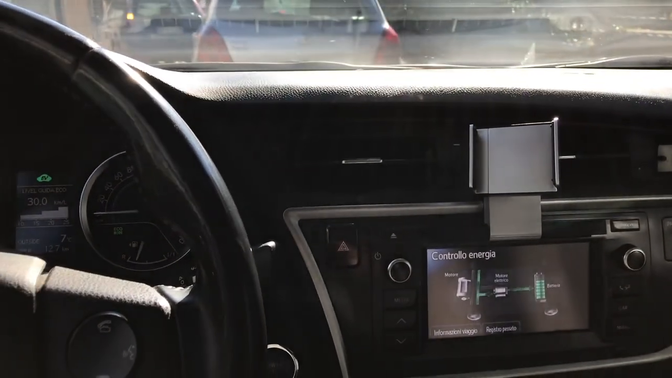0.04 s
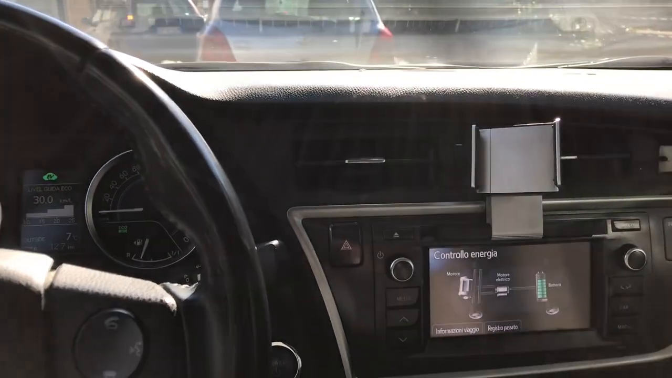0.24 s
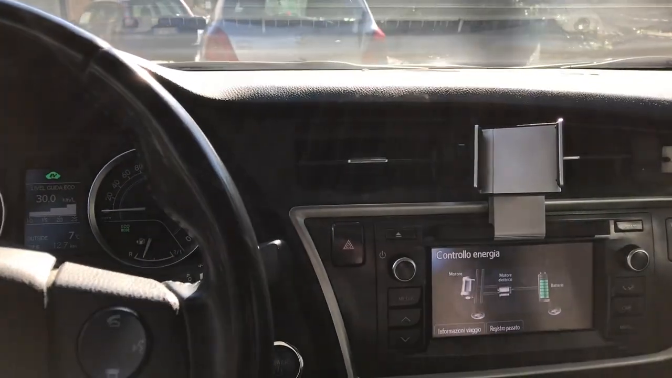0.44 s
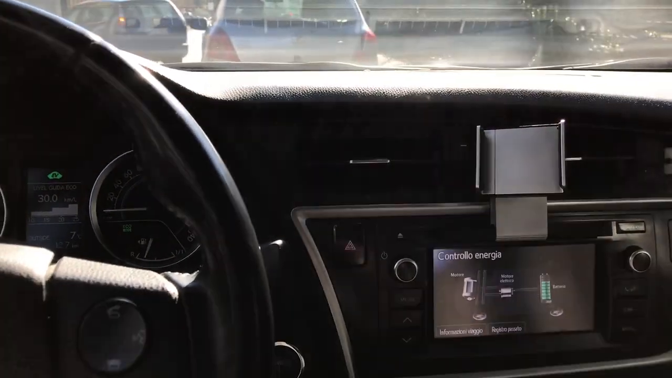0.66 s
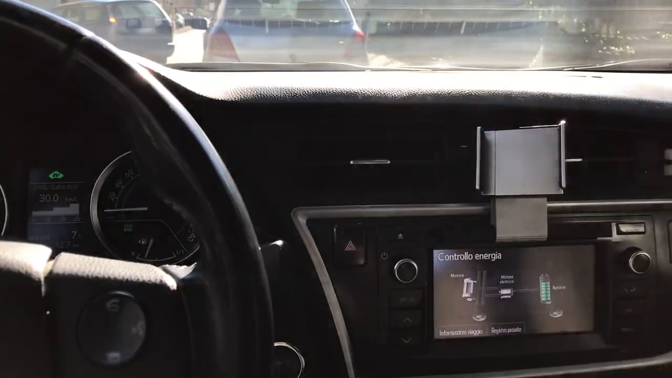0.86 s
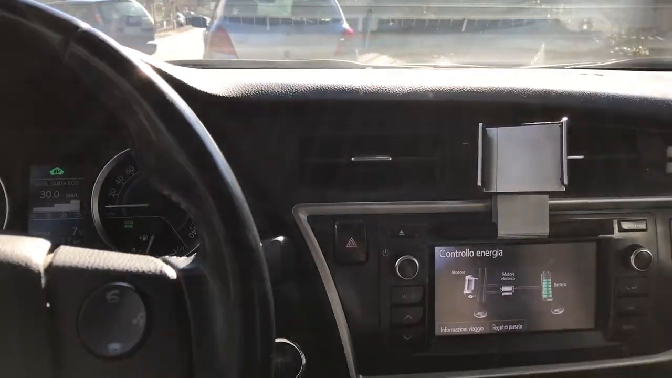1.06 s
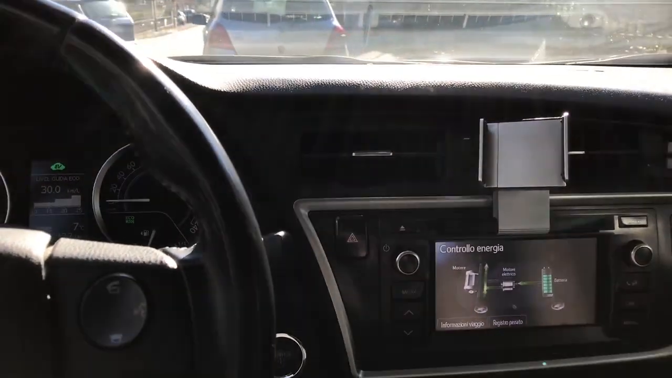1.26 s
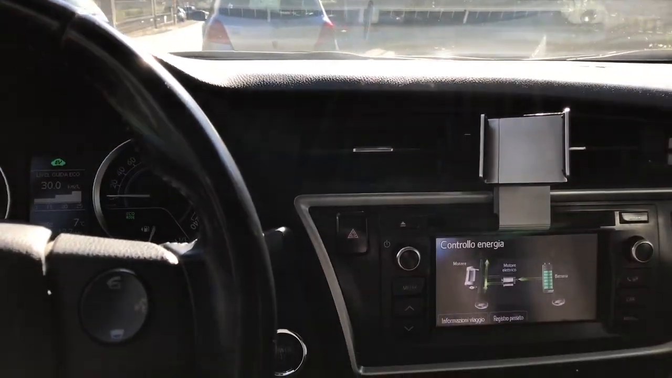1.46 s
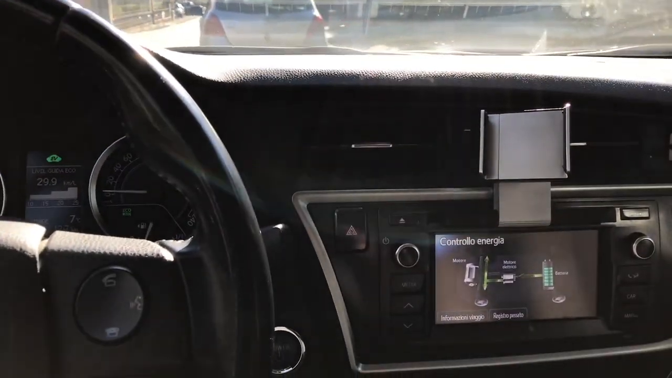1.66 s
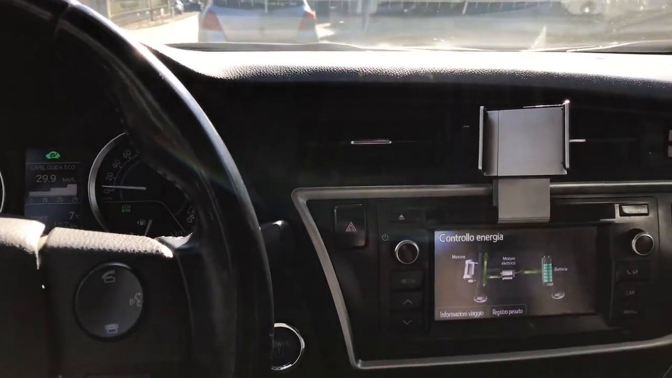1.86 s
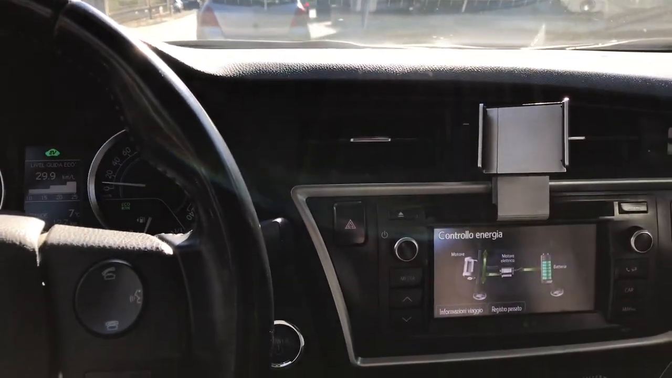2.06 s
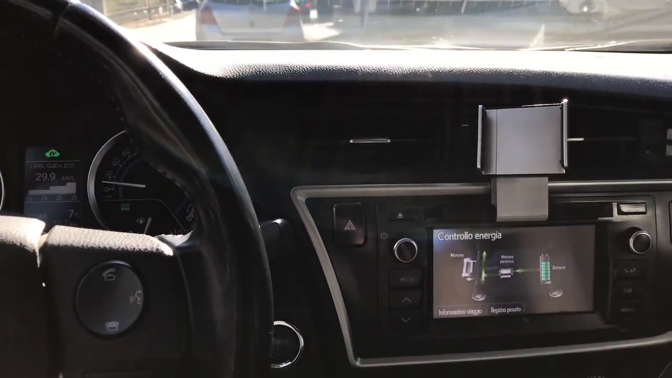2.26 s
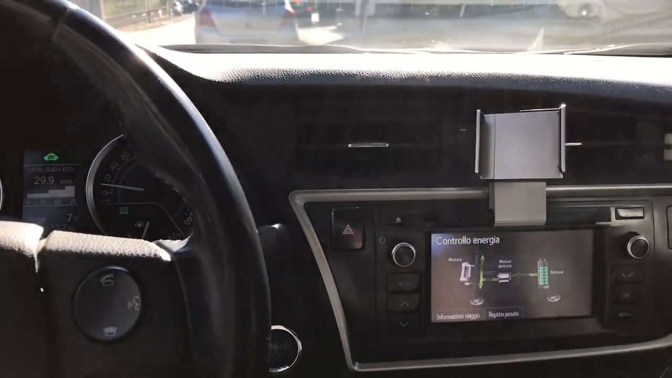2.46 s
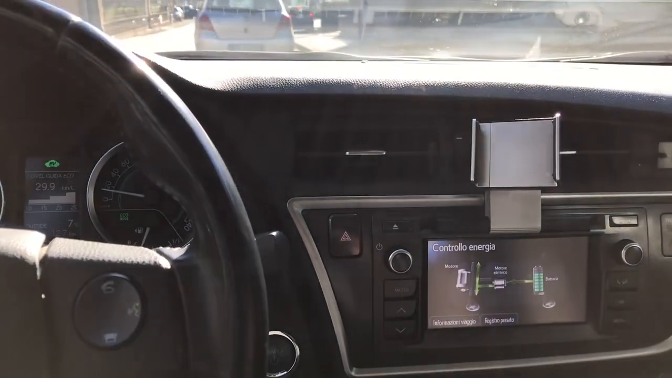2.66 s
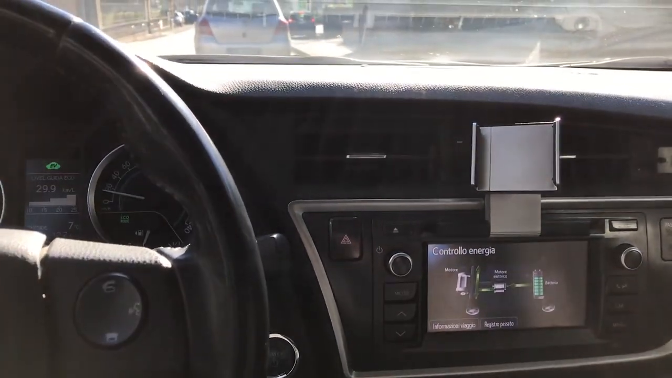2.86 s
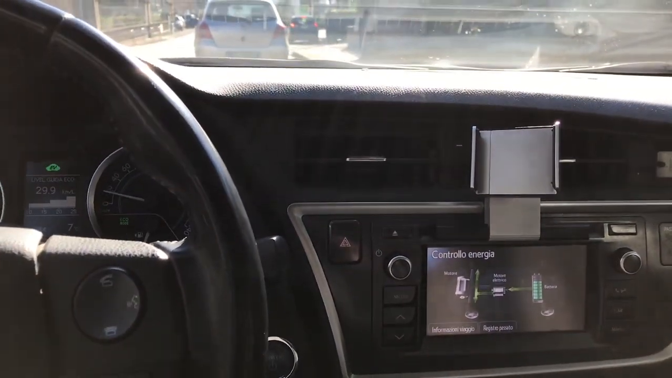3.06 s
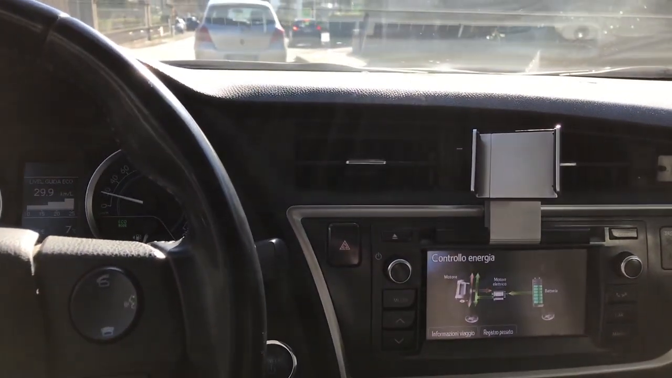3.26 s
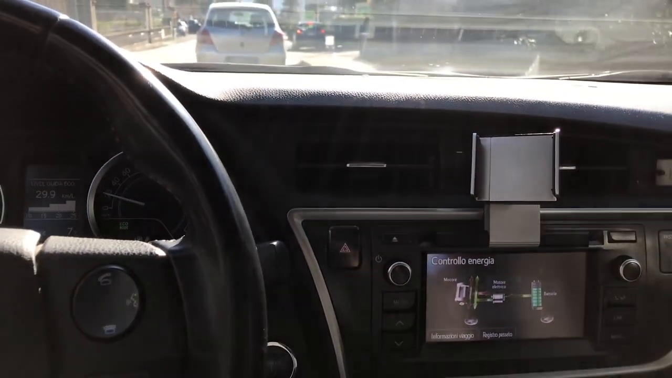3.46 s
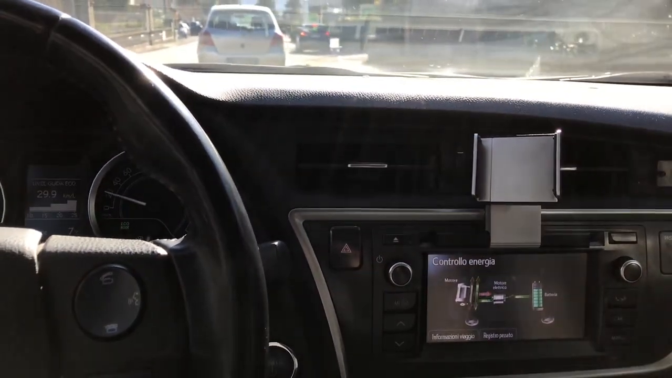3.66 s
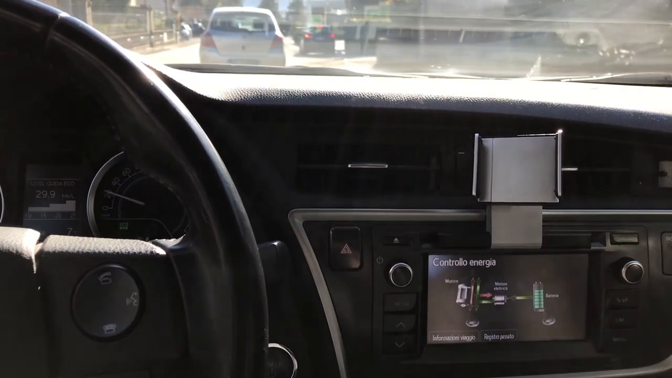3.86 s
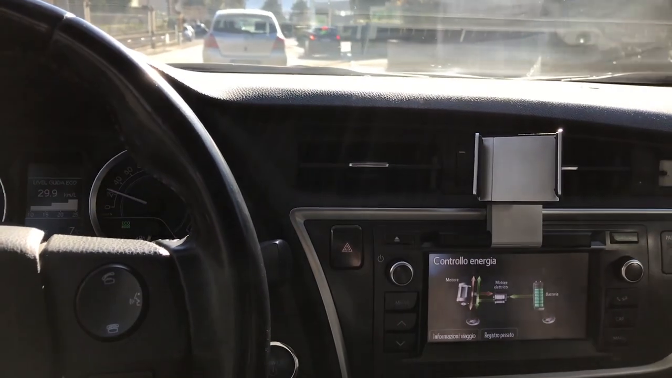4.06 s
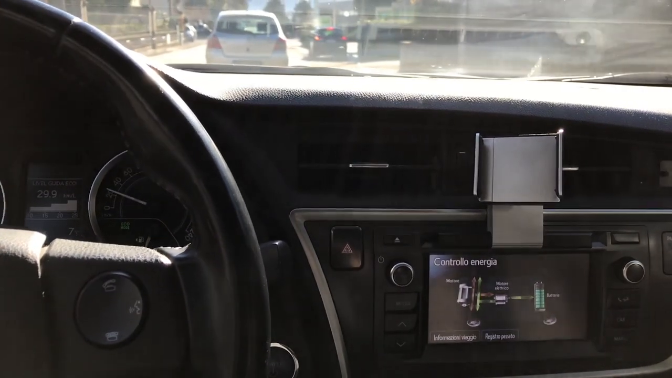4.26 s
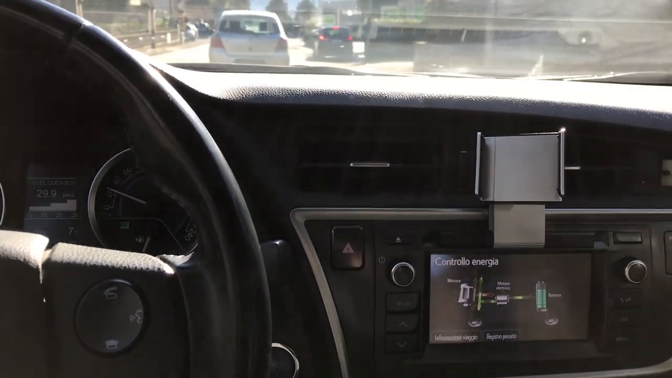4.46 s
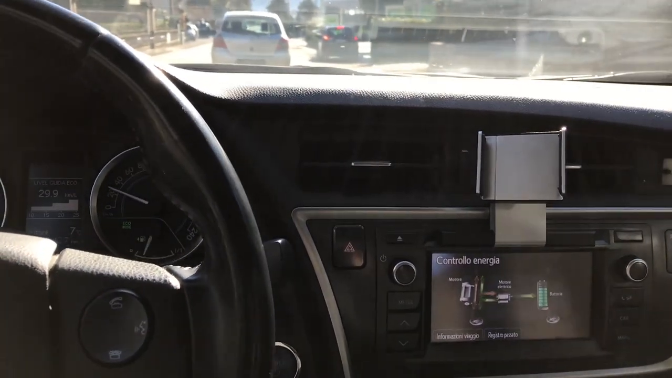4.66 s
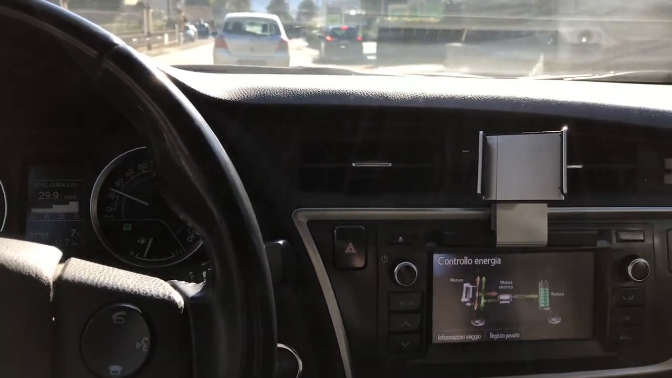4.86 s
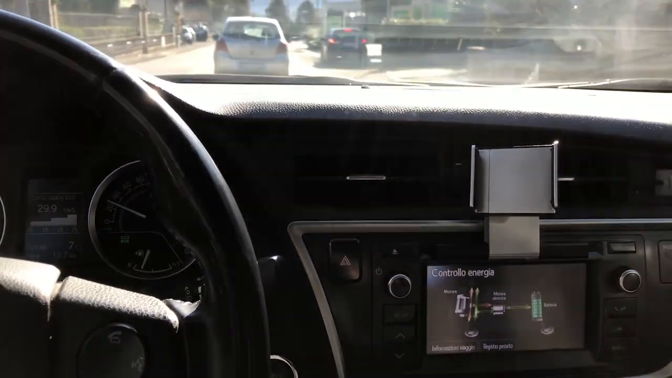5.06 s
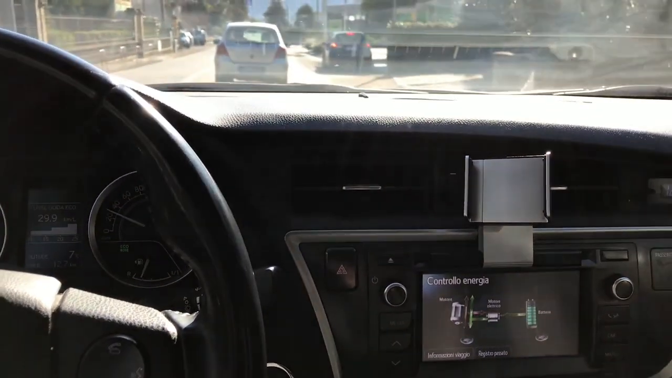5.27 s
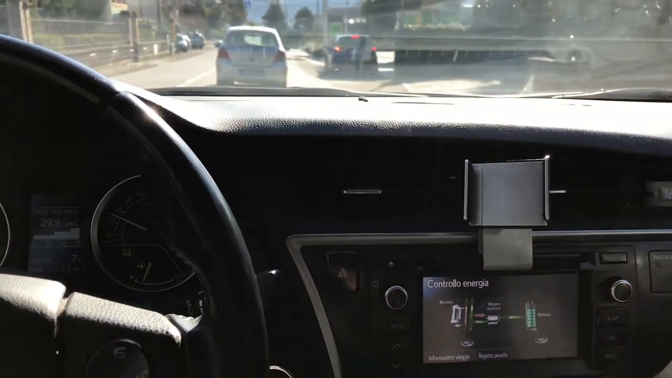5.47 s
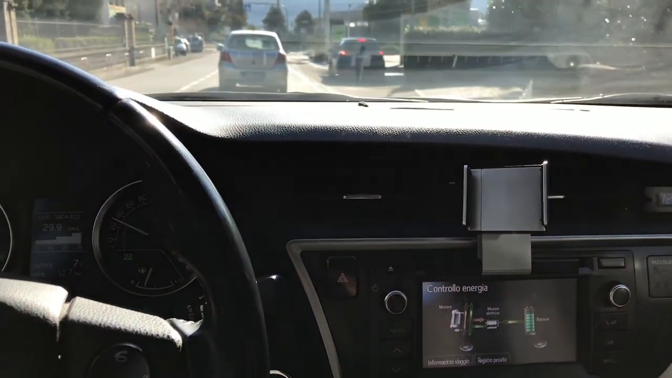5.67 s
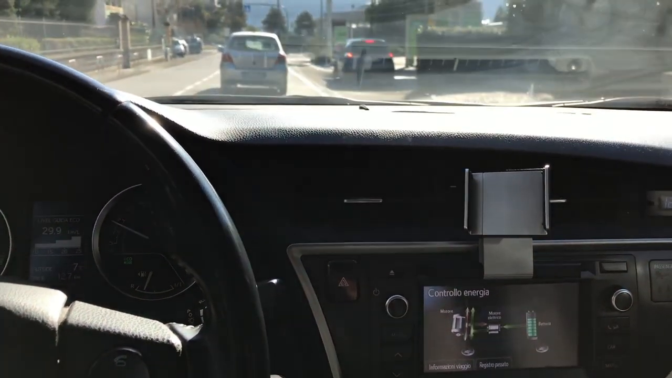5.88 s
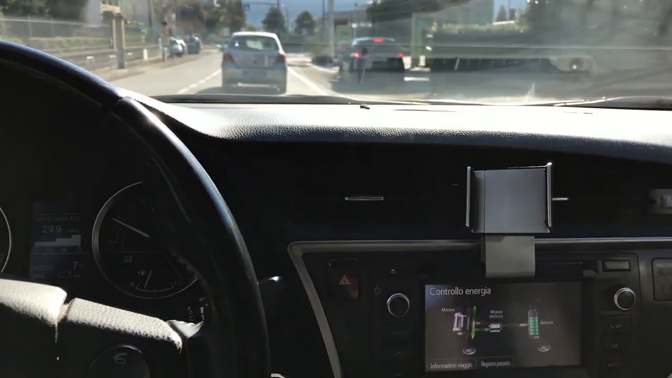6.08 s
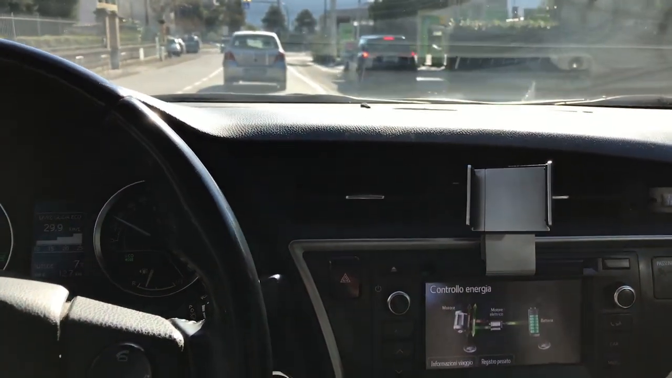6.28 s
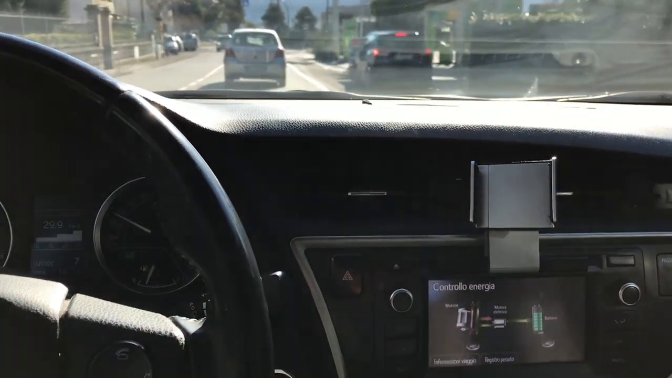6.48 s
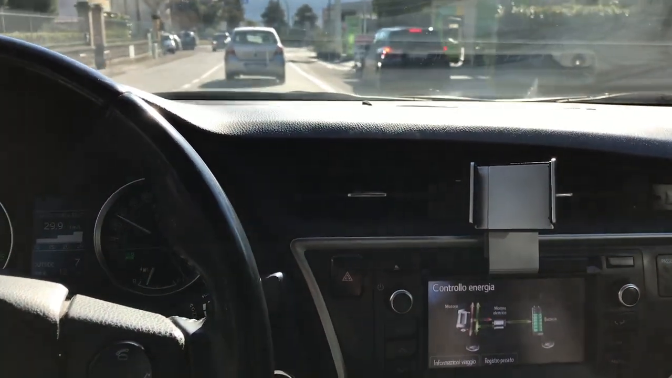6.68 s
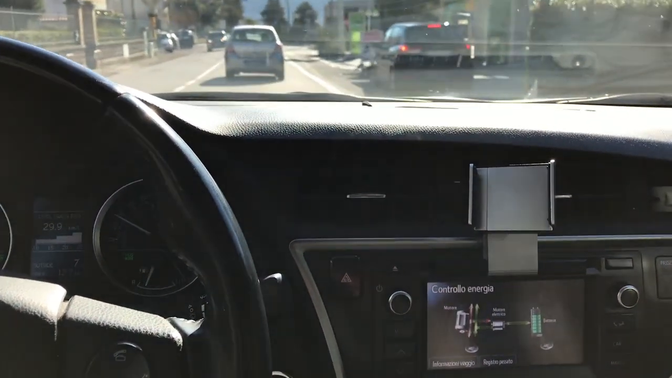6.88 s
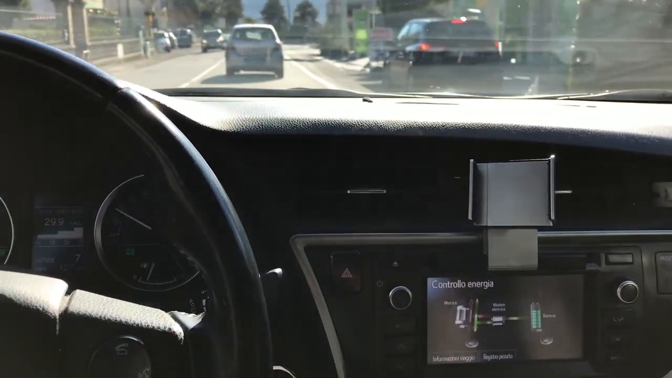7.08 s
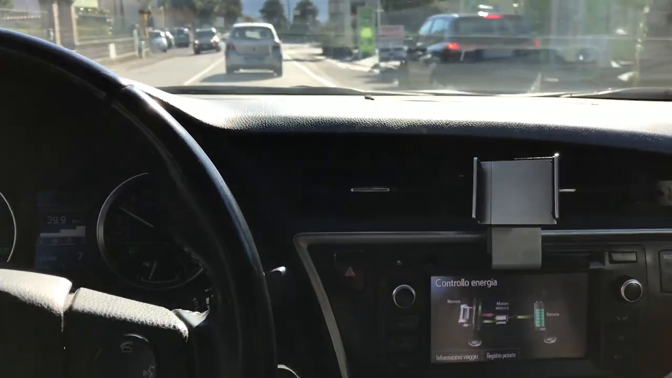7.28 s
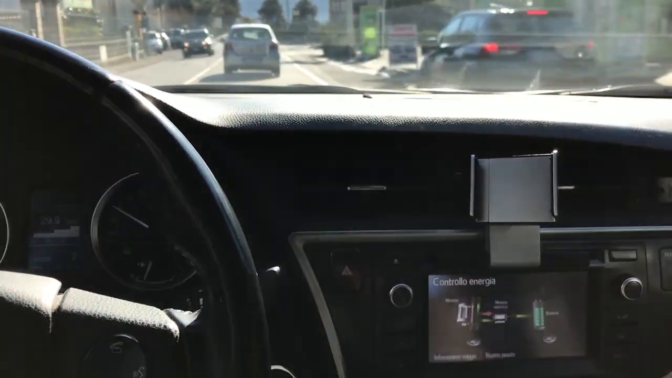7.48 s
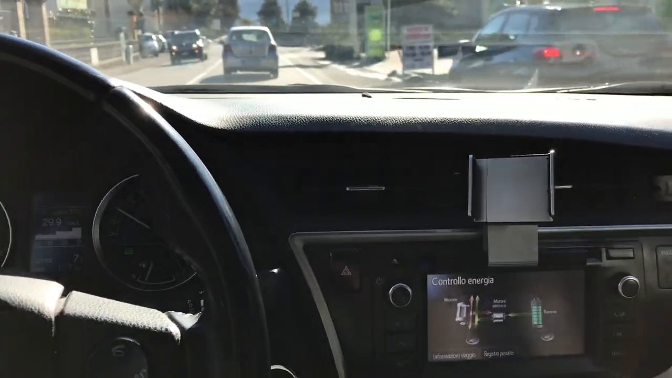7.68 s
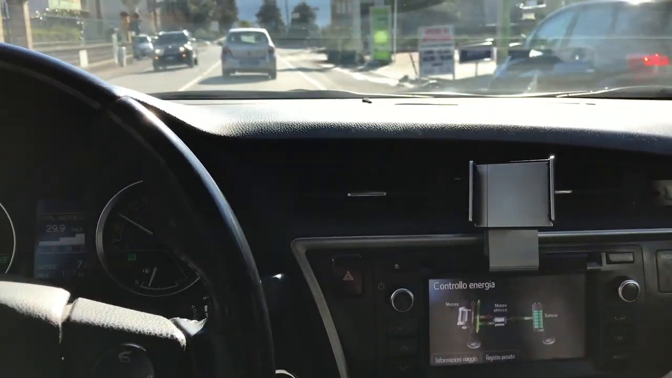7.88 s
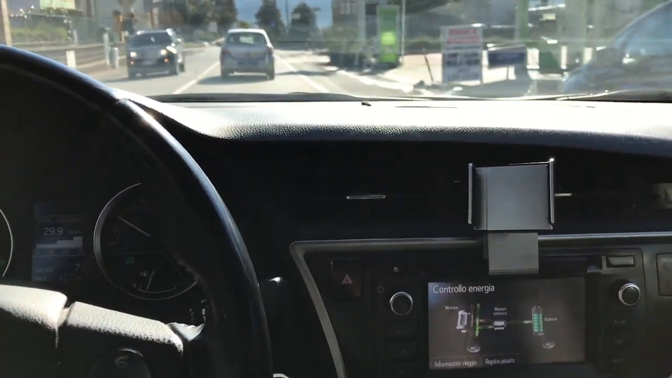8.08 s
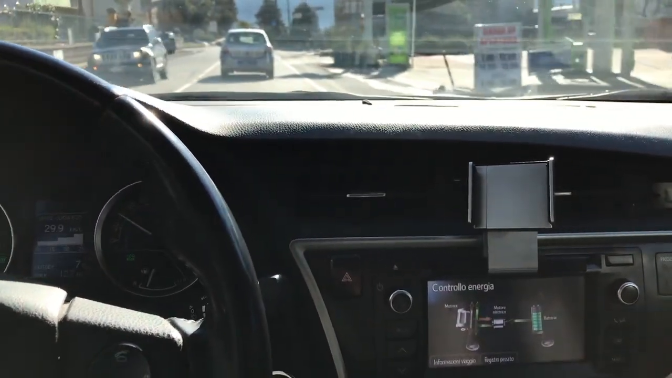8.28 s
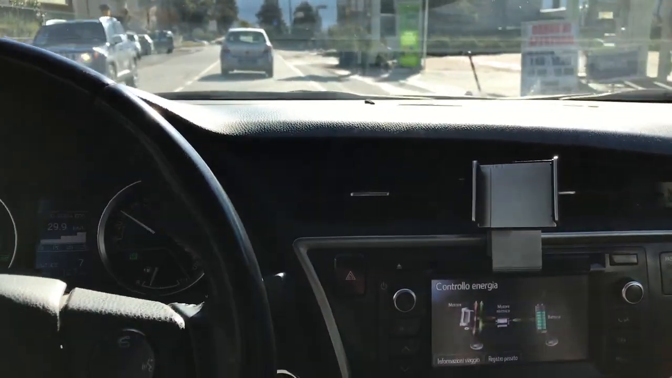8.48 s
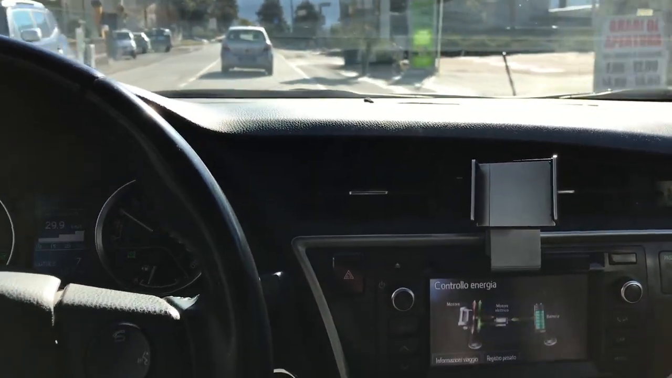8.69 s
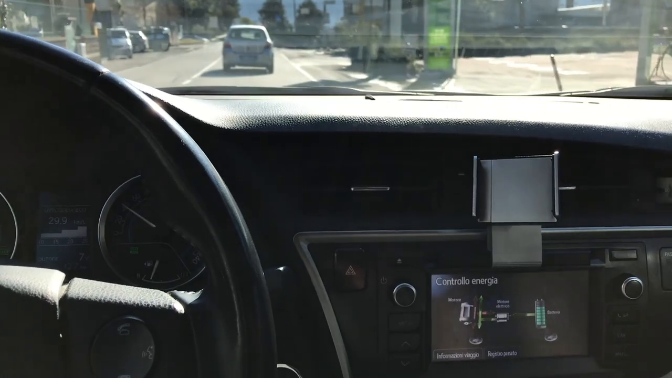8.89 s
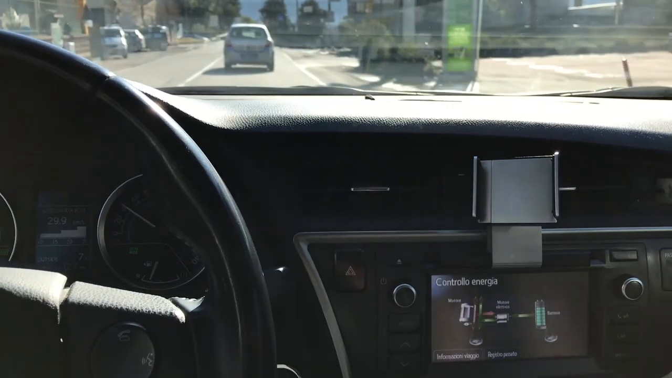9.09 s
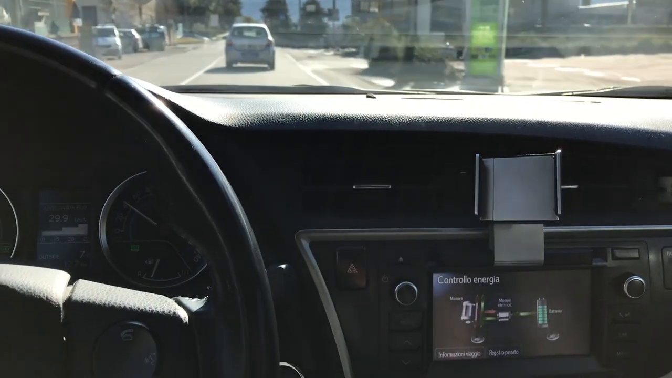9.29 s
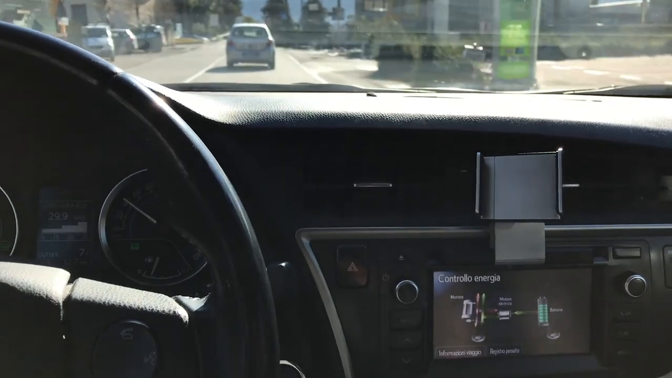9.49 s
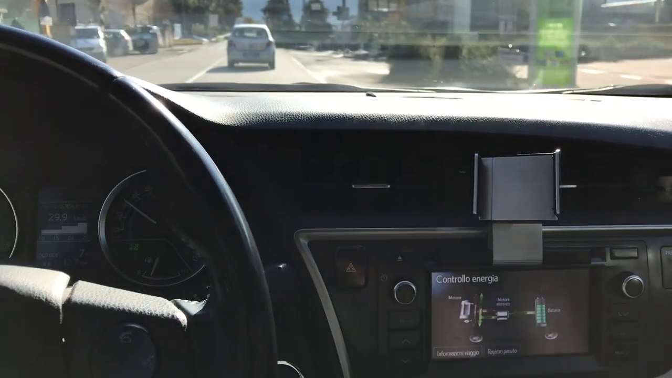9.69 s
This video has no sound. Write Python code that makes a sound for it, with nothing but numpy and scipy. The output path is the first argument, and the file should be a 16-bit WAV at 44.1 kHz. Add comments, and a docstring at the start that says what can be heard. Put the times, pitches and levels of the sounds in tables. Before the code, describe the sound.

Heard from the driver's seat, a hybrid car creeps along with a quiet low rumble. The steering wheel gives faint creaks and ticks, then a plastic catch snaps once, sharply. A soft electric whine climbs as the car pulls away, and the petrol engine starts with a light clatter and settles into a low drone. Tyre noise grows louder, and late on road bumps boom dully while another car passes faintly.

```python
"""Inside a hybrid car that creeps in traffic and then pulls away, over the rumble of the road.
The steering wheel creaks in the grip and a ratchet clicks as it turns back. The electric motor's whine
starts to climb, a plastic catch snaps once, and soft scuffs come and go, some of them a hand on the wheel.
The generator cranks the petrol engine, which clatters and booms in the cabin as the tyres grow louder.
Late on, road bumps boom, the trim ticks, the engine pulls again and another car goes by."""
import sys
import numpy as np
from scipy import signal
from scipy.fft import rfft, irfft, next_fast_len
from scipy.io import wavfile
from scipy.ndimage import uniform_filter1d

SR = 44100
rng = np.random.default_rng(int(sys.argv[2]) if len(sys.argv) > 2 else 0)


def inscribe(sig):
    """Save sig as 16-bit PCM at rate SR to the path in sys.argv[1].

    A 1-D sig is mono; a 2-D sig holds one channel per row.
    Samples are clipped to [-1, 1] before scaling.
    """
    pcm = np.round(np.clip(np.atleast_2d(sig).T, -1, 1) * 32767)
    wavfile.write(sys.argv[1], SR, pcm.astype(np.int16))


N = 429534
TIME = np.arange(N) / SR

# speed of the car, as the pitch of the motor's whine: (time [s], pitch [Hz])
MOTOR_PITCH = [(1.15, 124.9), (1.7, 209.9), (2.3, 338), (2.9, 444.7), (4.2, 581.5), (5.6, 735), (7.2, 835),
               (9.74, 890)]
CRUISE_HZ = 890   # that pitch at the highest speed
# speed of the four-cylinder engine: (time [s], firing rate [Hz])
FIRING_RATE = [(3.5, 37), (3.8, 49.5), (4.32, 48), (4.64, 42.3), (5.0, 44.8), (5.52, 46.2), (6.13, 46.5),
               (6.4, 40.5), (7.3, 40.2), (8.17, 41.9), (9.74, 44.5)]


def electric_drive(wobble=0.011, flutter_db=3, handover_s=2.886, shaft_db_per_doubling=14.5):
    """The motor whines six times a shaft cycle; its shaft hums while it pulls the car alone."""
    # the whine comes and goes as it sweeps the cabin's modes: (pitch [Hz], level [dB])
    cabin_response = [(240, -74), (295, -52.5), (335, -59), (365, -67), (395, -61), (430, -72), (595, -80),
                      (640, -70), (775, -72), (810, -86)]
    hz = in_time(MOTOR_PITCH)
    phase = turning(hz * (1 + wobble * drift(60)))
    shaft_db = -33 + shaft_db_per_doubling * np.log2(hz / np.interp(handover_s, TIME, hz))
    alone = 1 - fade_in(handover_s, 0.15)
    shaft = alone * from_db(shaft_db + drift(10)) * np.sin(phase / 6)
    whine = from_db(look_up(cabin_response, hz) + flutter_db * drift(16)) * np.sin(phase)
    overtone = from_db(-73) * swell_at(2.07, 0.19) * np.sin(2 * phase)   # only at low speed
    return np.sqrt(2) * fade_in(MOTOR_PITCH[0][0], 0.37) * (shaft + whine + overtone)


def engine(wobble=0.003, throb=0.25, cabin_hz=135, cabin_half_width_hz=12):
    """The firing booms in the cabin; orders three and five sing under load, order two when coasting."""
    # strength of the boom: (firing rate [Hz], level [dB])
    boom_levels = [(40, -37.5), (42.5, -35.5), (43.8, -30.5), (47, -30.5), (50, -33)]
    # spells under load: (start [s], attack [s], end [s])
    pulls = [(3.65, 0.33, 6.25), (8.1, 0.14, 9.8)]
    firing = in_time(FIRING_RATE)
    phase = turning(firing * (1 + wobble * drift(14)))
    running = fade_in(FIRING_RATE[0][0], 0.16)
    loaded = sum(held(start, attack, end, release_s=0.17) for start, attack, end in pulls)
    boom = from_db(look_up(boom_levels, firing) + 0.8 * drift(12)) * np.sin(phase)
    second = from_db(-44) * (1 - loaded) * np.sin(2 * phase)
    third = from_db(-37) * loaded * (1 + throb * np.sin(phase / 2)) * np.sin(3 * phase)
    third /= np.hypot(1, (3 * firing - cabin_hz) / cabin_half_width_hz)   # loudest on the cabin mode
    fifth = from_db(-56) * loaded * np.sin(5 * phase)
    return np.sqrt(2) * running * (boom + second + third + fifth)


def clatter(level_db=-60.5, beat_depth=0.34):
    """Valves and chain rasp in time with the firing as the engine takes up the load, then settle."""
    # colour of the rasp: (frequency [Hz], level [dB])
    rasp = [(270, 5), (335, 21), (420, 3.5), (510, 9), (800, -11.5), (1250, 3), (1700, -9), (2700, -14)]
    envelope = held(start_s=3.62, attack_s=0.055, end_s=4.33, release_s=1.0)
    beat = 1 + beat_depth * np.sin(turning(in_time(FIRING_RATE)))
    return from_db(level_db) * envelope * beat * noise(rasp)


def generator(top_s=3.92, top_hz=66.2, sweep_hz_per_s=27, body_hz=49.7, body_width_hz=1.7):
    """The generator cranks the engine, then slows; its hum swells each time it crosses the body mode."""
    hz = top_hz - sweep_hz_per_s * np.abs(TIME - top_s)
    resonance = from_db(-29.5) / np.hypot(1, 2 * (hz - body_hz) / body_width_hz)
    direct = from_db(-42) * hz / top_hz
    cranking = held(start_s=2.75, attack_s=0.026, end_s=4.57, release_s=0.026)
    return np.sqrt(2) * cranking * (resonance + direct) * from_db(drift(13)) * np.sin(turning(hz))


def road(rumble_knee_hz=305, drone_knee_hz=853, roar_db_per_doubling=14.5, flutter_db=1.02):
    """Asphalt shakes the suspension, drums in the tyres and roars under the tread, more so with speed."""
    # colours of the three bands, each: (frequency [Hz], level [dB])
    suspension_colour = [(18, -11), (42, -1.5), (54, 5), (70, -4), (95, -5), (125, -4), (160, -15),
                         (200, -38)]
    tyre_colour = [(110, -22.5), (165, 6.5), (195, -1.5), (215, 4), (245, -3), (290, -2.5), (325, -11),
                   (385, -10), (520, -20), (800, -26)]
    roar_colour = [(300, 5), (500, 3), (680, -4.5), (930, 1), (1400, -3.5), (3200, -21), (5000, -36.5),
                   (9000, -61)]
    # rough and smooth asphalt: (middle [s], half length [s], extra rumble [dB], extra drone [dB])
    patches = [(0.235, 0.12, 5, 8.5), (1.03, 0.086, 3, -3), (5.198, 0.85, -3, 0.5), (7.6, 0.53, 2.5, 1.5)]
    speed = in_time(MOTOR_PITCH)
    rumble_db = -35.5 + sum(db * swell_at(s, half) for s, half, db, _ in patches)
    drone_db = -42.5 + sum(db * swell_at(s, half) for s, half, _, db in patches)
    # rumble and drone level off once the motor's pitch passes their knees
    rumble_gain = from_db(rumble_db) / np.hypot(1, rumble_knee_hz / speed)
    drone_gain = from_db(drone_db) / np.hypot(1, drone_knee_hz / speed)
    coarse_db = 4 * fade_in(2.8, 0.089)   # the asphalt turns coarser
    roar_db = -63 + roar_db_per_doubling * np.log2(speed / CRUISE_HZ) + coarse_db
    roar_gain = np.sqrt(from_db(roar_db) ** 2 + traffic_power())   # other cars share this band
    rumble = rumble_gain * steadied(noise(suspension_colour), span_s=0.18, share=1)
    drone = drone_gain * steadied(noise(tyre_colour), span_s=0.088, share=0.31)
    roar = roar_gain * from_db(flutter_db * drift(25)) * noise(roar_colour)
    return rumble + drone + roar


def low_booms(ring_cycles=18.5, rise_cycles=4.6, low_cut_hz=30):
    """Low booms swell and die away: road bumps, plus a brief 95 Hz hum as the car gathers speed."""
    # low booms: (time [s], level [dB], pitch [Hz])
    booms = [(0.201, -36, 51.3), (1.519, -29.5, 53), (2.039, -33, 95), (2.261, -28, 46.2),
             (7.38, -18.5, 46.9), (7.68, -28.5, 72), (8.5, -22, 42.5), (9.219, -34, 81.4)]
    out = np.zeros(N)
    for s, db, hz in booms:
        swell = dying(s, ring_cycles / hz) - dying(s, rise_cycles / hz)
        out += 2 * from_db(db) * swell * np.sin(2 * np.pi * hz * (TIME - s))
    return filtered(out, low_cut_hz, "high")


def knocks(t60=0.13):
    """Each joint in the asphalt sends a short, dull thump through the suspension."""
    # joints under the tyres: (time [s], level [dB])
    joints = [(.924, -41.5), (0.952, -46), (1.309, -42), (1.784, -43.5)]
    # colour of a thump: (frequency [Hz], level [dB])
    colour = [(70, -23), (130, 1), (210, -6), (500, -33)]
    envelope = sum(from_db(db) * dying(s, t60) for s, db in joints)
    thumps = envelope * steadied(noise(colour), span_s=0.02, share=0.44)
    return filtered(thumps, colour[-1][0], "low")


def tread(long_ratio=0.336, short_ratio=0.42, width_hz=55, short_db_per_doubling=14):
    """Unevenly spaced tread blocks give blurred, climbing hums; the short ones sing higher, at speed."""
    # how the cabin passes the long blocks' hum: (pitch [Hz], level [dB])
    cabin_response = [(100, -51.5), (145, -42.5), (205, -52.5), (280, -51.5), (350, -62)]
    speed = in_time(MOTOR_PITCH)
    long_hz = long_ratio * speed
    long_blocks = from_db(look_up(cabin_response, long_hz)) * hum(long_hz, width_hz)
    short_db = -55 + short_db_per_doubling * np.log2(speed / CRUISE_HZ)
    return long_blocks + from_db(short_db) * hum(short_ratio * speed, width_hz)


def catch(panel_below_hz=1400, crack_db=-9, crack_t60=0.062, edge_t60=0.028):
    """A plastic catch snaps and rebounds; the first rebound shakes the low modes of its panel fully, the later
    ones barely move them."""
    # snap and rebounds: (time [s], level [dB], share reaching the panel [0-1], sharp edge [dB])
    contacts = [(1.479, -31.5, 0.9, -9), (1.487, -42.5, 1, -22), (1.495, -34, 0.074, -10),
                (1.506, -36, 0.33, -24), (1.545, -50.5, 0.35, -9)]
    # ring of the catch and its panel: (frequency [Hz], level [dB], t60 [s])
    modes = [(414, -8, 0.15), (812, -4, 0.12), (860, 0, 0.043), (950, -1, 0.058), (1880, -15, 0.079),
             (1940, -17, 0.063), (2310, -16, .06), (2550, -14, 0.039), (3360, -20, 0.062),
             (3476, -17, 0.085), (4410, -16, 0.052)]
    # colours of the crack and of its sharp edge, each: (frequency [Hz], level [dB])
    crack_colour = [(200, 12.5), (900, -2), (2000, -1.5), (3500, -3.5), (10000, -18.5)]
    edge_colour = [(3000, -3), (6000, -1), (12500, 0), (16000, -11)]
    ringing, crack, edge, direct = np.zeros((4, N))
    for hz, db, t60 in modes:
        clicks = np.zeros(N)
        for s, blow_db, panel_share, _ in contacts:
            reach = panel_share if hz < panel_below_hz else 1
            clicks[round(s * SR)] = from_db(blow_db + db) * reach * rng.choice([-1, 1])
        ringing += ring(clicks, hz, t60)
    for s, blow_db, _, edge_db in contacts:
        crack += from_db(blow_db + crack_db) * dying(s, crack_t60)
        edge += 0.5 * from_db(blow_db + edge_db) * dying(s, edge_t60)
        direct[round(s * SR)] = 2 * from_db(blow_db + edge_db)
    snap = filtered(direct, 2500, "high", order=1)   # the bare impulse, ahead of its reflections
    return ringing + snap + crack * noise(crack_colour) + edge * noise(edge_colour)


def ratchet(body_t60=0.068, treble_t60=0.021, split_hz=6500):
    """A pawl in the steering column drops from tooth to tooth, and its housing rings briefly."""
    # drops of the pawl: (time [s], level [dB])
    teeth = [(0.8434, -50.5), (.999, -51), (1.168, -51.5), (1.375, -52.5)]
    # ring of the housing: (frequency [Hz], level [dB])
    colour = [(800, -1), (2500, 3), (4300, 4.5), (5200, -4), (6400, 4), (7900, -6), (8800, 5.5),
              (10200, -13), (14000, 2), (15500, -12)]
    housing = noise(colour)
    body = signal.sosfiltfilt(signal.butter(2, split_hz, fs=SR, output="sos"), housing)
    treble = housing - body
    return sum(from_db(db) * (body * dying(s, body_t60) + treble * dying(s, treble_t60))
               for s, db in teeth)


def ticks(direct_db=15, t60=0.042):
    """The trim slips at different spots: each tick is a bare impulse, then its own close reflections."""
    # slips: (time [s], level [dB], centre [Hz], spread each way [octaves])
    slips = [(.308, -60, 11500, 0.75), (1.684, -44, 2350, 0.35), (1.765, -60, 3240, 0.7),
             (7.363, -63, 4500, 0.65), (7.6842, -53, 2170, 0.36), (7.749, -61, 2300, 0.18),
             (8.56, -59, 2320, 0.28), (8.792, -58, 9400, 0.57), (8.98, -59, 7750, 0.26),
             (9.49, -55.5, 2348, 0.23)]
    out = np.zeros(N)
    age = np.arange(SR // 8) / SR
    decay = np.exp(-np.log(1000) * age / t60)
    for s, db, hz, octaves in slips:
        tick = rng.standard_normal(len(age)) * decay + from_db(direct_db) * (age == 0)
        band_hz = np.clip([hz / 2 ** octaves, hz * 2 ** octaves], 100, 0.45 * SR)
        tick = rms_one(filtered(tick, band_hz, "band")) * np.sqrt(np.mean(decay ** 2))
        at = round(s * SR)
        out[at:at + len(age)] += from_db(db) * tick[:N - at]
    return out


def scuffs(ribs_per_s=190, unevenness=0.151, taper=3.9):
    """Short, soft scuffs in the cabin with a ribbed grain, some of them a hand on the wheel."""
    # scuffs: (middle [s], level [dB], half length [s])
    touches = [(1.799, -66, .009), (2.42, -75, .015), (2.915, -72, 0.029), (4.65, -63.5, 0.016),
               (4.696, -58, .006), (4.717, -51, 0.016), (4.75, -64, 0.01), (5.196, -60.5, 0.02),
               (7.436, -70, 0.024), (7.703, -66.5, .01)]
    # colour of a scuff: (frequency [Hz], level [dB])
    colour = [(700, 1.5), (4200, -2), (7000, -10), (16000, -37.5)]
    # wheel resonances that tint the scuffs: (frequency [Hz], width [Hz], boost [dB])
    modes = [(1434, 70, 13), (2080, 110, 7.5), (2870, 110, 6), (4030, 86, 2), (6720, 130, 10)]
    envelope = sum(from_db(db) * swell_at(s, half, taper) for s, db, half in touches)
    rib_phase = turning(ribs_per_s * (1 + unevenness * drift(ribs_per_s)))
    ribs = rms_one(from_db(np.sin(rib_phase)))   # a ripple of 1 dB each way
    hz = np.geomspace(colour[0][0], colour[-1][0], 400)
    boost_db = sum(db / (1 + (2 * (hz - centre) / width) ** 2) for centre, width, db in modes)
    return envelope * ribs * noise(np.transpose([hz, look_up(colour, hz) + boost_db]))


def creaking(level_db=-74, slips_per_s=150, decay_s=0.004, middle_s=0.56, spread_s=0.26):
    """The grip on the turning wheel gives tiny separate slips while the car creeps."""
    colour = [(1800, -4), (6000, 3), (16000, -10)]   # (frequency [Hz], level [dB])
    swell = np.exp(-0.5 * ((TIME - middle_s) / spread_s) ** 2)
    slips = (rng.random(N) < slips_per_s / SR).astype(float)
    grains = signal.lfilter([1], [1, -np.exp(-1 / (decay_s * SR))], slips + 1e-18)
    return from_db(level_db) * swell * grains * noise(colour)


def traffic_power(far_db=-71):
    """Power of the street's roar: steady far traffic, and a swell as each car goes by."""
    # passing cars: (time when nearest [s], half length [s], level [dB])
    cars = [(0.097, 0.33, -61.5), (8.867, 0.31, -57.5)]
    passing = sum(from_db(db) ** 2 / (1 + ((TIME - s) / half) ** 2) for s, half, db in cars)
    return from_db(far_db) ** 2 + passing


def cabin_air(hiss_db=-69, buzz_hz=996.3, whistle_hz=15002, singing_from_s=5.3):
    """A bed of faint hiss, electronic buzz, a thin whistle and, later, a blurred electrical whine."""
    # hiss of the still cabin: (frequency [Hz], level [dB])
    hiss_colour = [(200, -3.5), (950, 18), (1500, 1.5), (4200, 1), (5000, -3.5), (6000, -1.5), (7400, -6),
                   (8700, -3), (10400, -7), (16000, -5.5)]
    # tones of the electrical whine: (frequency [Hz], level [dB])
    tones = [(3790, -88.5), (4375, -93), (6020, -94.5), (8430, -95)]
    buzz = from_db(-98) * sum(np.sin(2 * np.pi * (k * buzz_hz * TIME + rng.random()))
                              for k in range(4, 11))
    whistle = from_db(-91) * np.sin(2 * np.pi * whistle_hz * TIME)
    singing = (TIME > singing_from_s) * sum(from_db(db) * hum(hz, width_hz=45) for hz, db in tones)
    return from_db(hiss_db) * noise(hiss_colour) + np.sqrt(2) * (buzz + whistle) + singing


def from_db(db):
    """Decibels to gain."""
    return 10 ** (np.asarray(db) / 20)


def rms_one(x):
    """Scale to unit power."""
    return x / np.sqrt(np.mean(x ** 2) + 1e-20)


def look_up(curve, x):
    """Value of a two-column curve at x."""
    return np.interp(x, *np.transpose(curve))


def in_time(curve):
    """A curve over time, at every sample."""
    return look_up(curve, TIME)


def filtered(x, hz, kind, order=2):
    """Low-, high- or band-pass filter."""
    return signal.sosfilt(signal.butter(order, hz, kind, fs=SR, output="sos"), x)


def noise(spectrum):
    """Unit-power noise coloured by rows of (frequency [Hz], level [dB])."""
    hz, db = np.transpose(spectrum)
    size = next_fast_len(N)
    bins = np.maximum(np.fft.rfftfreq(size, 1 / SR), 1)
    colour = from_db(np.interp(np.log(bins), np.log(hz), db, left=-np.inf, right=-np.inf))
    return rms_one(irfft(rfft(rng.standard_normal(size)) * colour, size)[:N])


def drift(rate):
    """Random wander of unit power, changing about rate times a second."""
    return rms_one(np.interp(TIME * rate, np.arange(2000), rng.standard_normal(2000)))


def steadied(x, span_s, share):
    """Noise with a share of its slow swells evened out."""
    power = uniform_filter1d(x ** 2, int(span_s * SR)) + 1e-12
    return rms_one(x / power ** (share / 2))


def turning(hz):
    """Phase of something that turns at a changing rate."""
    return 2 * np.pi * np.cumsum(hz) / SR


def hum(hz, width_hz):
    """A blurred tone of about unit power."""
    phase = turning(hz * np.ones(N))
    return drift(width_hz) * np.cos(phase) + drift(width_hz) * np.sin(phase)


def ring(clicks, hz, t60):
    """A unit click sets a sine of height 1 ringing."""
    decay, step = from_db(-60 / (t60 * SR)), 2 * np.pi * hz / SR
    return signal.lfilter([0, np.sin(step)], [1, -2 * decay * np.cos(step), decay ** 2], clicks + 1e-18)


def dying(start_s, t60):
    """Envelope that jumps to 1 and falls 60 dB in t60 seconds."""
    return (TIME >= start_s) * np.exp(-np.log(1000) * np.clip((TIME - start_s) / t60, 0, 3))


def swell_at(s, half_s, taper=4):
    """A smooth hump of height 1 around a moment."""
    return 1 / (1 + np.abs((TIME - s) / half_s) ** taper)


def fade_in(start_s, length_s):
    """A straight ramp from 0 to 1."""
    return np.clip((TIME - start_s) / length_s, 0, 1)


def held(start_s, attack_s, end_s, release_s):
    """Envelope that rises from start_s, holds at 1 and falls from end_s."""
    return fade_in(start_s, attack_s) * (1 - fade_in(end_s, release_s))


def scene():
    """The mono mix, as heard from the driver's seat."""
    rolling = road() + tread() + low_booms() + knocks()
    drive = engine() + clatter() + electric_drive() + generator()
    cabin = catch() + ticks() + ratchet() + scuffs() + creaking() + cabin_air()
    return (rolling + drive + cabin)[None]


def record(dry, cutoff_hz=15900, fade_s=0.008):
    """The ends are eased and the top is cut steeply."""
    ends = np.clip(np.minimum(TIME, TIME[-1] - TIME) / fade_s, 0, 1)
    return signal.sosfilt(signal.ellip(10, 0.1, 80, cutoff_hz, fs=SR, output="sos"), dry * ends)


dry = scene()
out = record(dry)
inscribe(out)
```